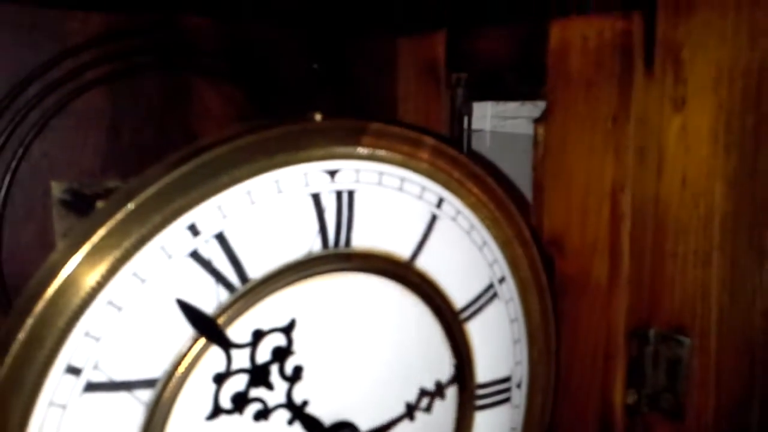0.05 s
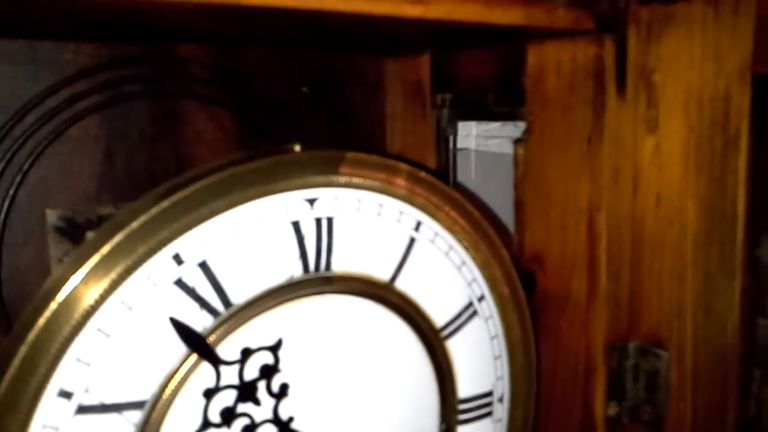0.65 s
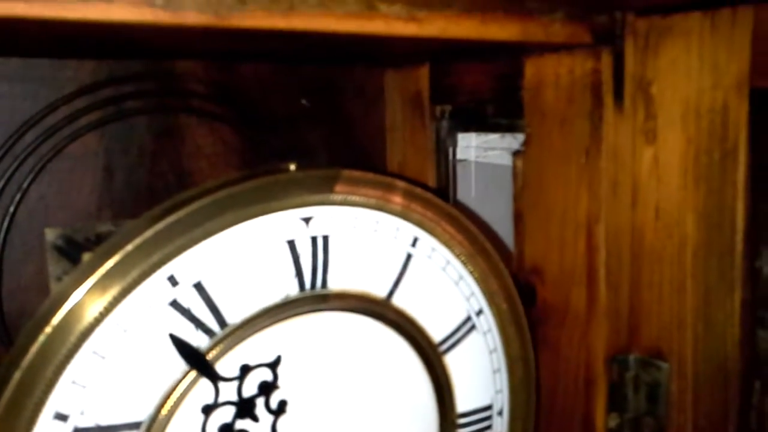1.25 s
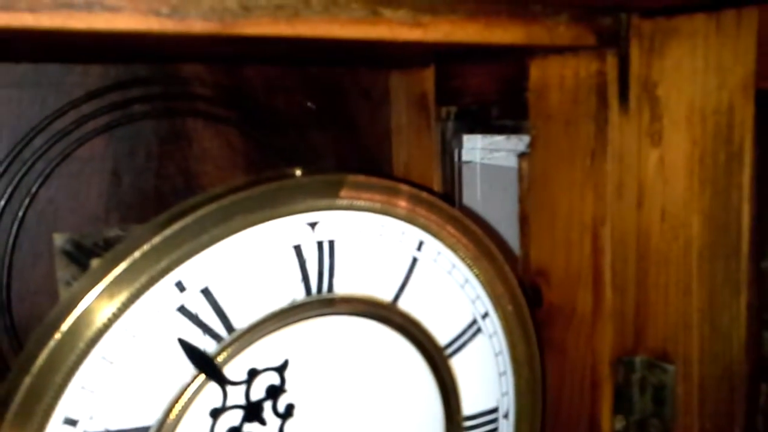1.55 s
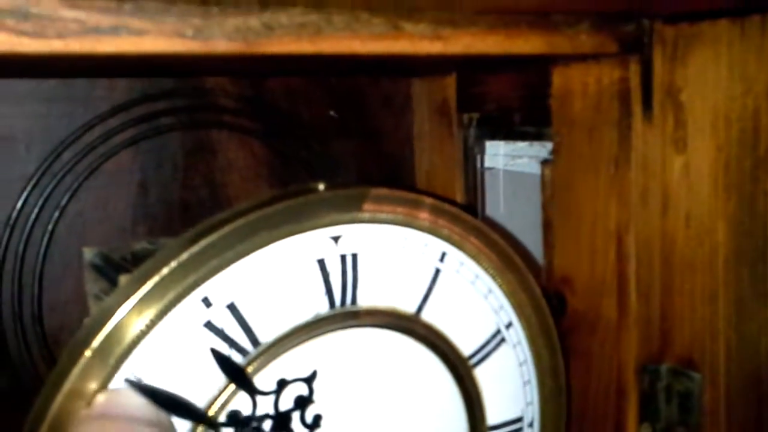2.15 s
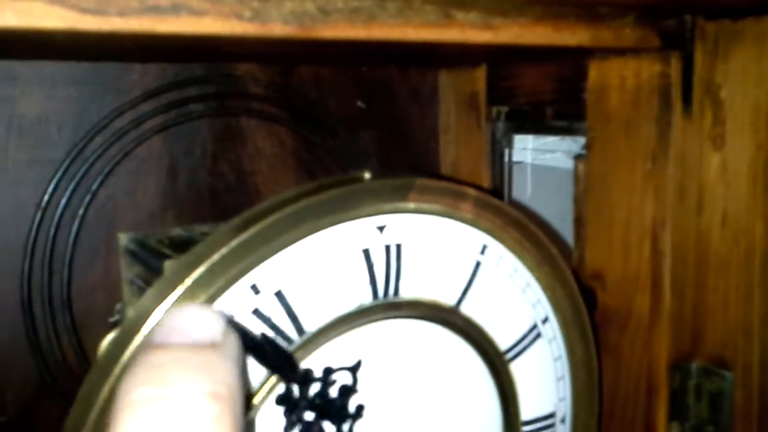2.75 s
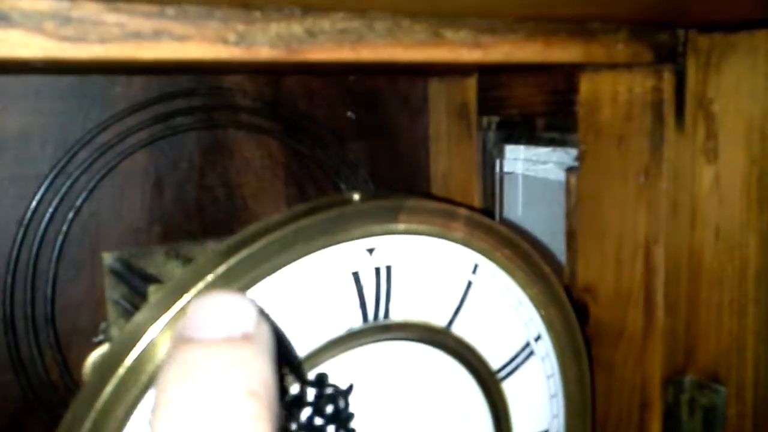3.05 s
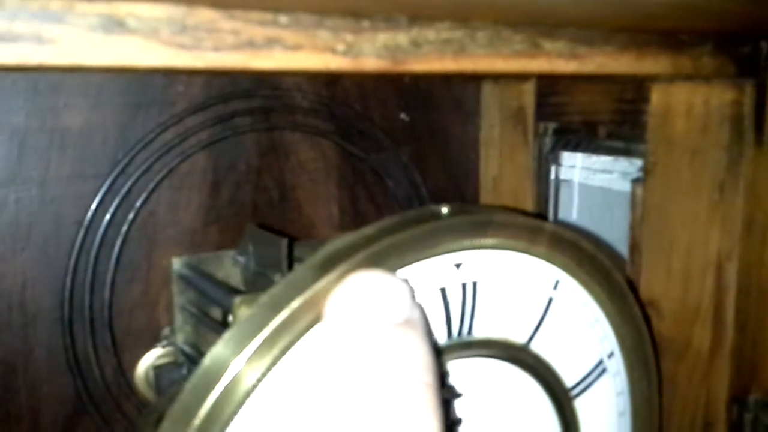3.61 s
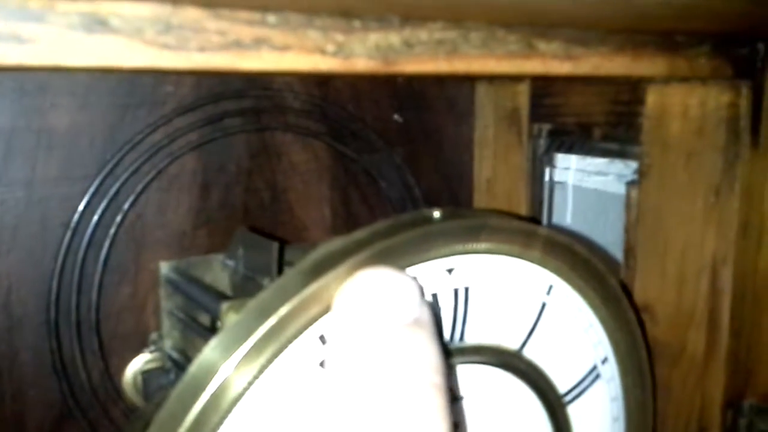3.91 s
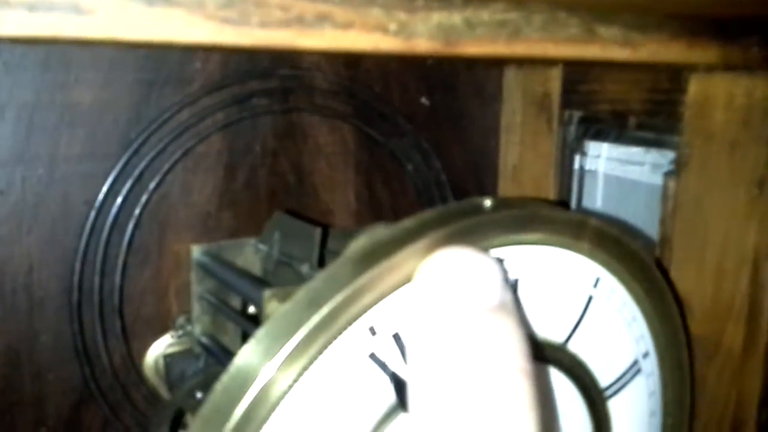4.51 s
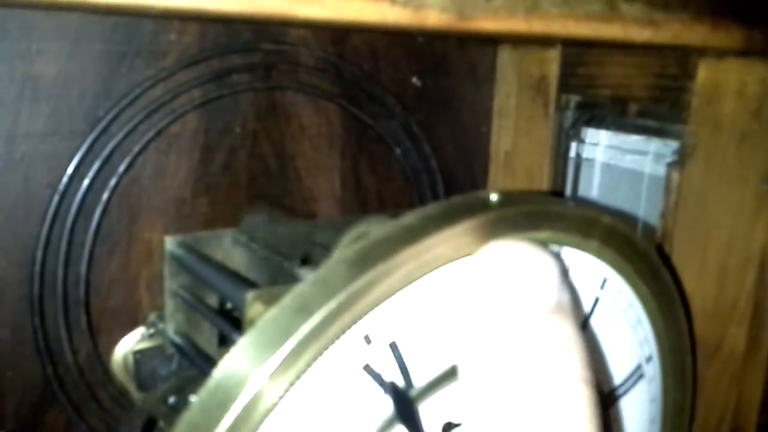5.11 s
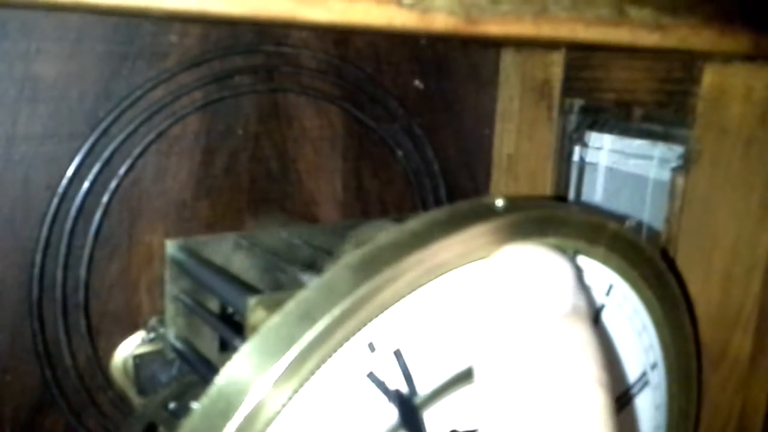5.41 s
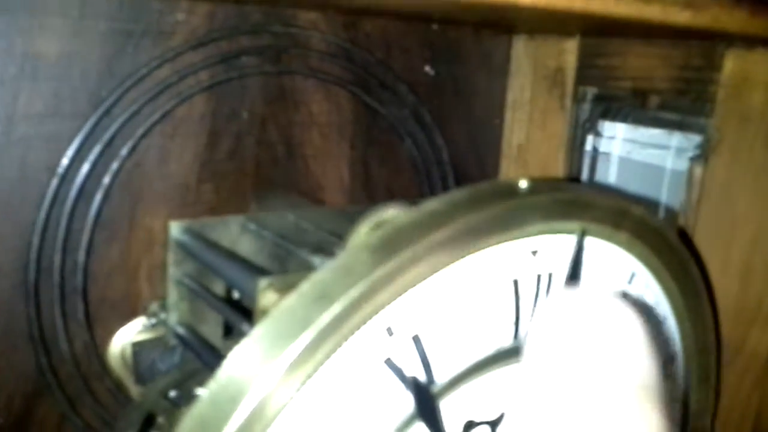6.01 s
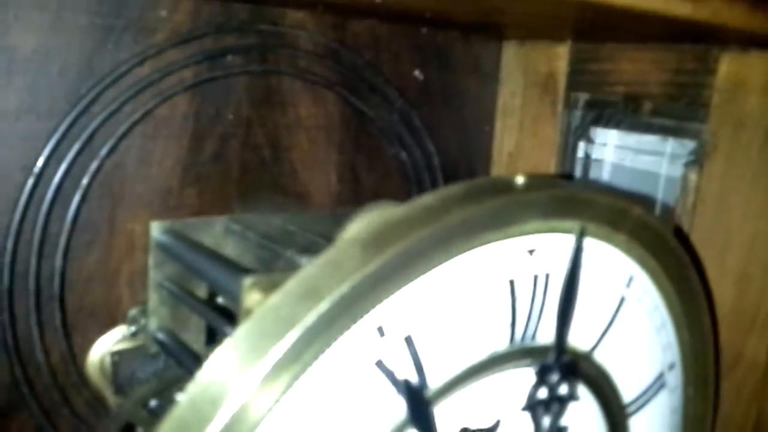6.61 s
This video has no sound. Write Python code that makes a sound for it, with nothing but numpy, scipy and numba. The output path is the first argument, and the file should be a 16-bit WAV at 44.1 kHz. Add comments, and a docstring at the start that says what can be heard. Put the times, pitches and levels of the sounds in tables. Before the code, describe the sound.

A pendulum wall clock ticks softly and steadily in a quiet room, a little way from the microphone. Much closer, the fingers holding the microphone make dull rubs, light scrapes and muffled bumps. Past the middle, the steel minute hand catches with a quick run of small clinks as it is pushed round. The grip then lets go with one hard slide and a loud knock, leaving faint hiss and ticking.

```python
"""A soft bump and a rub of skin come first, over faint microphone hiss and the rumble of a quiet room.
It is the grip on a hand-held camera, very close, whose case rings dully. Farther off, a pendulum wall
clock ticks softly as its two pallets take turns, and the steel minute hand catches and clinks while
a finger pushes it round the dial. The grip ends in one hard slide and knock as it lets go."""
import sys
import numpy as np
from scipy import signal
from scipy.fft import rfft, irfft, next_fast_len
from scipy.io import wavfile
from numba import njit

SR = 44100
rng = np.random.default_rng(int(sys.argv[2]) if len(sys.argv) > 2 else 0)


def put_to_file(sound):
    """Save the sound as 16-bit audio at rate SR, in the file named by the first command-line argument."""
    columns = np.atleast_2d(sound).T  # one column per channel
    safe = np.clip(columns, -1, 1)
    whole_steps = np.round(safe * 32767)
    wavfile.write(sys.argv[1], SR, whole_steps.astype(np.int16))


N = 298204
TIME = np.arange(N) / SR
RING = 8192  # samples in one impulse response
BINS_HZ = np.maximum(np.fft.rfftfreq(RING, 1 / SR), 1)

# slow wavering of the hiss: (time [s], relative level [dB])
HISS_LEVELS = [(0, -72), (.18, -64), (.3, -63.5), (1.58, -63), (2.67, -62), (3.05, -63.5), (3.68, -61),
               (3.88, -65.5), (4.0, -61.5), (4.38, -62.5), (4.6, -64.5), (5.1, -62.5), (5.58, -69),
               (5.85, -69), (6.17, -58.5), (6.52, -65.5), (6.76, -63)]
# tone of the microphone and skin hiss: (frequency [Hz], relative level [dB])
HISS_COLOUR = [(20, 1), (300, 6), (800, 9), (1500, 5), (2600, 0), (4500, 0.5), (7000, 0.5), (14500, 0.5)]
# tone of the room rumble: (frequency [Hz], relative level [dB])
ROOM_COLOUR = [(20, -22), (35, -10), (55, -6), (95, -5.5), (150, -1), (240, -8), (450, -15.5), (800, -26.5),
               (2000, -29.5), (8000, -49)]

# dull ring of the camera case: (frequency [Hz], width [Hz], gain [dB])
CASE_MODES = [(74.6, 76, -8.5), (139.5, 46, 1), (184.7, 66, 3.5), (288, 48, -3), (367, 133, 1.5),
              (458, 226, -1), (529, 39, -4.5), (733, 96, -6), (795, 120, -8.5), (861, 100, -8.5),
              (1450, 230, -23.5), (1775, 220, -23.5), (4600, 3200, -38)]
# strokes of the grip: (start [s], rise [s], fall [s], crest level [dB], finger pad note [Hz])
RUBS = [(.11, 0.017, .08, -52, 450), (.48, .02, .09, -54.5, 446), (.635, 0.018, .1, -42.5, 450),
        (.94, 0.045, 0.11, -57, 450), (1.28, .08, 0.2, -53, 462), (1.645, 0.028, 0.57, -49, 490),
        (1.91, .11, 0.19, -41.5, 530), (2.361, 0.041, 0.016, -38, 574), (2.5, .045, 0.069, -37.5, 450),
        (2.605, 0.038, 0.054, -32, 462), (2.713, 0.0096, 0.1, -28, 493), (2.81, 0.032, 0.087, -44, 480),
        (3.095, 0.098, .22, -40, 460), (3.42, .2, 0.099, -40, 730), (3.98, 0.021, .12, -49.5, 630),
        (4.26, 0.094, 0.16, -45, 676), (4.68, .08, 0.15, -61, 443), (5.0, 0.043, 0.37, -54, 415),
        (5.62, 0.074, .08, -60, 434), (5.885, 0.12, .02, -51.5, 450), (6.16, .04, 0.23, -64, 430)]
# sheen of sliding skin: (frequency [Hz], width [Hz], gain [dB])
WHISPER_MODES = [(5450, 630, 1), (4730, 2200, -12), (2600, 270, -3.5), (1870, 210, 1)]
# strokes that whisper: (start [s], length [s], level [dB])
WHISPERS = [(1.64, 0.62, -68.5), (2.57, 0.46, -66.5), (3.087, 0.35, -67), (3.383, 0.31, -63.5),
            (5.91, 0.16, -63)]
# midrange of a scrape: (frequency [Hz], width [Hz], gain [dB])
SCRAPE_BODY_MODES = [(577, 150, 12), (1090, 420, 2), (1680, 530, -9)]
# crisp top of a scrape: (frequency [Hz], width [Hz], gain [dB])
SCRAPE_EDGE_MODES = [(2000, 500, 5.5), (2680, 510, 3), (4460, 1100, -1), (5820, 1200, 2), (9000, 3700, -10)]
# short dry scrapes: (start [s], length [s], level [dB], edge against body [dB])
SCRAPES = [(0.628, 0.045, -52.5, -5), (0.665, .012, -50.5, 10), (0.695, 0.04, -51.5, -1.5),
           (1.819, 0.061, -54, -5), (2.631, 0.0088, -53, 6), (4.142, 0.03, -44, -16)]
# the hard slide as the grip lets go: (start [s], rise [s], fall [s], crest level [dB])
SLIDES = [(6.012, 0.072, 0.022, -21), (6.118, .01, 0.017, -17.5)]
# rasp of that slide: (frequency [Hz], width [Hz], gain [dB])
RASP_MODES = [(3330, 500, 3.5), (4430, 1100, 8), (5000, 600, 8), (5620, 380, 7)]
# bumps on the case, soft flesh pitched low: (time [s], thud peak [dB], pitch of the push [Hz])
KNOCKS = [(.090, -28, 466), (.159, -38.5, 200), (.464, -29.5, 430), (.722, -29, 256), (.792, -35, 800),
          (.797, -30, 600), (.957, -21.5, 472), (0.961, -32.5, 189), (.999, -36.5, 220),
          (1.192, -40.5, 219), (1.349, -40.5, 149), (1.888, -24, 400), (2.698, -24.5, 650),
          (2.72, -25, 497), (2.737, -26, 517), (2.785, -23.5, 624), (2.929, -32, 624), (3.186, -37, 303),
          (3.218, -26, 496), (3.223, -28, 720), (3.342, -28.5, 630), (3.452, -19.5, 82),
          (3.943, -18.5, 179), (3.962, -29, 170), (3.991, -38, 189), (4.111, -40, 226), (4.152, -33.5, 260),
          (4.701, -37, 330), (6.005, -24.5, 190), (6.112, -12, 337), (6.116, -4, 390), (6.128, -12.5, 696),
          (6.143, -17.5, 343)]
# snap of hard plastic: (frequency [Hz], width [Hz], gain [dB])
SNAP_MODES = [(1310, 960, 3), (1860, 250, -17), (3560, 780, -7), (5000, 3800, -15.5)]

# ring of the steel minute hand: (frequency [Hz], width [Hz], gain [dB])
HAND_MODES = [(1440, 260, -3), (1990, 300, -13), (3500, 360, 0), (4800, 400, -9), (6000, 1200, -20)]
# the minute hand catches: (time [s], peak [dB])
CLINKS = [(5.0795, -33), (5.105, -42), (5.131, -58)]
# ring of the brass movement: (frequency [Hz], width [Hz], gain [dB])
MOVEMENT_MODES = [(1420, 400, 1), (1850, 400, -6), (2600, 600, -10), (3600, 900, -8), (4900, 560, -.5),
                  (6300, 1500, -16)]
# beats of the escapement, tick and tock in turn: (peak before the tock is dulled [dB])
BEAT_DB = [-50, -45, -43, -44.5, -48, -45, -38.5, -48, -43, -50, -54, -51]


def amp(db):
    """Turn decibels into gain."""
    return 10 ** (np.asarray(db) / 20)


def unit(x):
    """Scale to rms 1."""
    return x / np.sqrt(np.mean(x ** 2))


def peak(x):
    """Scale to a peak of 1."""
    return x / np.abs(x).max()


def add(out, time_s, sound):
    """Mix a sound in at its cue."""
    start = int(time_s * SR)
    out[start:start + len(sound)] += sound[:N - start]


def band(x, low_hz, high_hz):
    """Gently roll off lows and highs."""
    x = signal.sosfilt(signal.butter(2, low_hz, "high", fs=SR, output="sos"), x)
    return signal.sosfilt(signal.butter(1, high_hz, fs=SR, output="sos"), x)


def response(modes):
    """Impulse response of a body with steep-sided resonances."""
    power = sum(amp(db) ** 2 / (1 + ((BINS_HZ / hz - hz / BINS_HZ) * hz / width) ** 2) ** 2
                for hz, width, db in modes)
    cepstrum = irfft(np.log(power + 1e-8) / 2)
    cepstrum[1:RING // 2] *= 2  # minimum phase: the ring follows the hit
    cepstrum[RING // 2 + 1:] = 0
    return irfft(np.exp(rfft(cepstrum)))


def ring(force, modes):
    """Play a force through a body."""
    return signal.oaconvolve(force, response(modes))[:len(force)]


@njit
def resonate(x, hz, width_hz):
    """State-variable band-pass with a moving centre."""
    out = np.empty(len(x))
    band_state, low_state = 0., 0.
    for i in range(len(x)):
        tuning, damping = np.tan(np.pi * hz[i] / SR), width_hz / hz[i]
        passed = (band_state + tuning * (x[i] + 1e-18 - low_state)) / (1 + tuning * (tuning + damping))
        band_state = 2 * passed - band_state
        low_state += 2 * tuning * passed
        out[i] = damping * passed
    return out


def noise(colour):
    """Coloured noise of rms 1."""
    hz, db = np.transpose(colour)
    size = next_fast_len(N, real=True)
    bins = np.maximum(np.fft.rfftfreq(size, 1 / SR), 1)
    tone = amp(np.interp(np.log(bins), np.log(hz), db))
    return unit(irfft(rfft(rng.standard_normal(size)) * tone, size)[:N])


def hiss_level():
    """Slowly wavering gain of the hiss."""
    return amp(np.interp(TIME, *np.transpose(HISS_LEVELS)))


def background(hiss_gain_db, rumble_db, rumble_follow):
    """The bed: microphone hiss wavers, and the low room rumble sags and swells with it."""
    waver = hiss_level()
    rumble = amp(rumble_db) * unit(waver ** rumble_follow) * noise(ROOM_COLOUR)
    return rumble + amp(hiss_gain_db) * waver * noise(HISS_COLOUR)


def slips(per_s, spread_db):
    """Stick-slip: tiny releases at random moments and of uneven size."""
    happens = rng.random(N) < per_s / SR
    return happens * rng.choice([-1, 1], N) * amp(spread_db * np.clip(rng.standard_normal(N), -2, 2))


def stutter(per_s, depth_db):
    """Skin catches and frees unevenly: a gain that jitters at random."""
    steps = rng.standard_normal(RING)
    return amp(depth_db * np.interp(TIME * per_s, np.arange(RING), steps))


def swell(start, length):
    """Rounded envelope of one light stroke."""
    return np.sqrt(np.maximum(1 - (2 * (TIME - start) / length - 1) ** 2, 0))


def pressure(start, rise, fall, db, swell_db, ease_db, edge_s=0.025):
    """Gain of one stroke: the skin takes hold, presses up to a crest, eases off and lifts."""
    t = np.arange(int((rise + fall + 2 * edge_s) * SR)) / SR - edge_s
    sag_db = np.maximum(swell_db * (rise - t) / rise, ease_db * (t - rise) / fall)
    contact = np.clip(np.minimum(t, rise + fall - t) / edge_s + 1, 0, 1)
    out = np.zeros(N)
    add(out, start - edge_s, amp(db - sag_db) * contact)
    return out


def skin_hiss(press, full_db, growth):
    """A broad hiss comes and goes with the contact, growing more slowly than the pressure."""
    return amp(full_db) * press ** growth * noise(HISS_COLOUR)


def whisper():
    """Longer strokes add a faint, fine-grained hiss of skin."""
    grain = unit(ring(slips(per_s=4000, spread_db=6.5), WHISPER_MODES))
    return grain * sum(amp(db) * swell(start, length) for start, length, db in WHISPERS)


def scrapes():
    """Dry, sparse slips crackle in a register well above the dull rubbing."""
    force = slips(per_s=1300, spread_db=3)
    body, edge = unit(ring(force, SCRAPE_BODY_MODES)), unit(ring(force, SCRAPE_EDGE_MODES))
    return sum(amp(db) * swell(start, length) * unit(body + amp(edge_db) * edge)
               for start, length, db, edge_db in SCRAPES)


def rubbing(resting_db, pad_db, overtone_db, flesh_db):
    """Skin slips over the case, coloured by the finger's flesh and the hollow note of its pad."""
    strokes = np.array([pressure(*row[:4], swell_db=6, ease_db=10.5) for row in RUBS])
    press = strokes.max(axis=0)
    force = slips(per_s=1200, spread_db=2) * stutter(per_s=60, depth_db=1.8)
    pad_hz = np.array(RUBS)[strokes.argmax(axis=0), -1]  # the strongest stroke sets the note
    note = resonate(force, pad_hz, width_hz=112.)
    overtone = resonate(force, 1.617 * pad_hz, width_hz=112.)
    flesh = resonate(force, hz=np.full(N, 182.4), width_hz=64.)
    finger = amp(pad_db) * (note + amp(overtone_db) * overtone) + amp(flesh_db) * flesh
    rub = unit(band(ring(force + finger, CASE_MODES), low_hz=215, high_hz=3600))
    creep = amp(resting_db) * unit(hiss_level() ** 2)  # even the resting grip creeps faintly
    return rub * np.maximum(press, creep) + skin_hiss(press, full_db=-49.5, growth=0.23)


def last_slide(rasp_db, rasp_growth, tear_db):
    """Pressed hard, the skin sounds deeper and rasps with the pressure until it tears free."""
    press = np.max([pressure(*row, swell_db=13.5, ease_db=9) for row in SLIDES], axis=0)
    body = unit(band(ring(slips(per_s=1500, spread_db=5.0), CASE_MODES), low_hz=196, high_hz=760))
    rasp = unit(ring(slips(per_s=2500, spread_db=3), RASP_MODES))
    tear = amp(tear_db) * swell(start=6.107, length=0.014)
    rasp_gain = amp(rasp_db) * press ** rasp_growth + tear
    return body * press + rasp * rasp_gain + skin_hiss(press, full_db=-30.5, growth=0.89)


def knocks(decay_cycles, snap_s, snap_db, snap_growth, firm_hz):
    """Each bump presses the case and rebounds in a thud; the first contact snaps on the plastic."""
    out, t = np.zeros(N), TIME[:RING]
    case, plastic = response(CASE_MODES), response(SNAP_MODES)
    for time_s, db, hz in KNOCKS:
        push = np.sin(2 * np.pi * hz * t) * np.exp(-hz * t / decay_cycles)
        thud = signal.fftconvolve(band(push, low_hz=hz * 0.34, high_hz=4000), case)
        snap = signal.fftconvolve(np.exp(-t / snap_s) * rng.standard_normal(RING), plastic)
        # the snap grows more slowly than the thud, and with the hardness of the push
        snap_gain = amp(snap_db + snap_growth * db) * np.sqrt(hz / firm_hz)
        add(out, time_s, amp(db) * peak(thud) + snap_gain * peak(snap))
    return out


def metal_clicks(events, modes, contact_s, chatter_db, chatter_s, cabinet_db, cabinet_s):
    """Metal meets metal: a sharp contact, a brief chatter and a short tail in the wooden cabinet."""
    out, t = np.zeros(N), TIME[:RING]
    chatter = amp(chatter_db) * np.exp(-t / chatter_s)
    cabinet = amp(cabinet_db) * np.exp(-t / cabinet_s)
    fade = np.exp(-t / contact_s) + chatter + cabinet
    for time_s, db in events:
        add(out, time_s, amp(db) * peak(ring(fade * rng.standard_normal(RING), modes)))
    return out


def minute_hand():
    """The pushed steel hand catches: a quick run of clinks, each softer than the last."""
    return metal_clicks(CLINKS, HAND_MODES, contact_s=0.0011, chatter_db=-9, chatter_s=0.005,
                        cabinet_db=-20, cabinet_s=0.027)


def escapement(first_tick_s, period_s, tock_lag_s):
    """The two pallets strike once each per pendulum period: a bright tick, then a duller tock."""
    beats = [(first_tick_s + k // 2 * period_s + k % 2 * tock_lag_s, db) for k, db in enumerate(BEAT_DB)]
    tick, tock = (metal_clicks(pallet, MOVEMENT_MODES, contact_s=0.0035, chatter_db=-2, chatter_s=0.012,
                               cabinet_db=-24, cabinet_s=0.03)
                  for pallet in (beats[::2], beats[1::2]))
    return tick + band(tock, low_hz=300, high_hz=4200)


def scene():
    """Mono mix of the clock, the close handling noise and the quiet room."""
    clinks = minute_hand()
    grip = rubbing(resting_db=-67, pad_db=0.5, overtone_db=-5.5, flesh_db=6.3)
    letting_go = last_slide(rasp_db=-47, rasp_growth=0.4, tear_db=-42.5)
    bumps = knocks(decay_cycles=0.5, snap_s=0.0024, snap_db=-31.5, snap_growth=0.52, firm_hz=450)
    handling = grip + letting_go + whisper() + scrapes() + bumps
    ticking = escapement(first_tick_s=0.3035, period_s=1.1472, tock_lag_s=0.554)
    bed = background(hiss_gain_db=6.0, rumble_db=-55, rumble_follow=0.85)
    return (ticking + clinks + handling + bed)[None]


def record(dry):
    """The camera cuts the top end steeply."""
    top_hz = 14450
    return signal.sosfilt(signal.ellip(12, .2, 70, top_hz, fs=SR, output="sos"), dry)


dry = scene()
out = record(dry)
put_to_file(out)
```